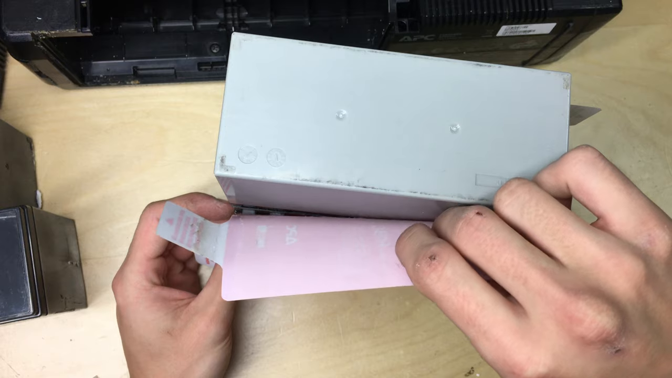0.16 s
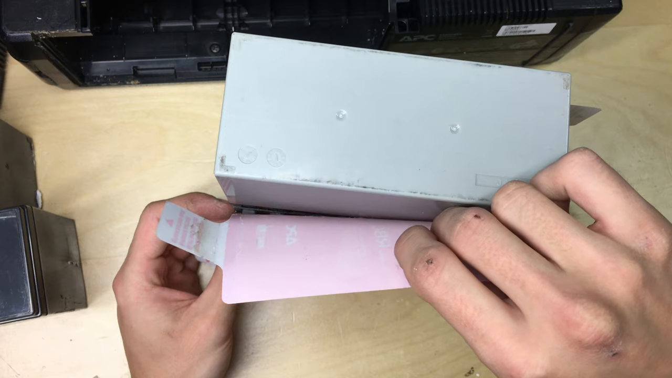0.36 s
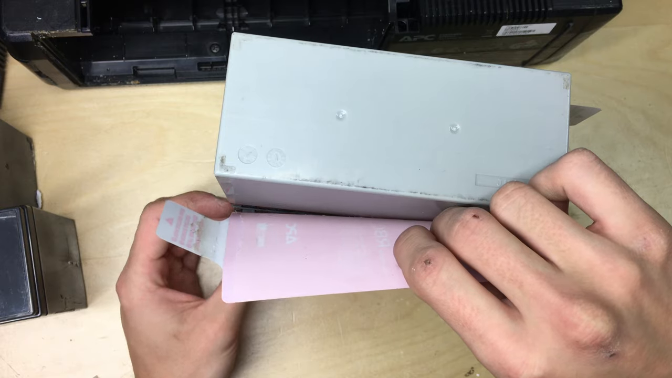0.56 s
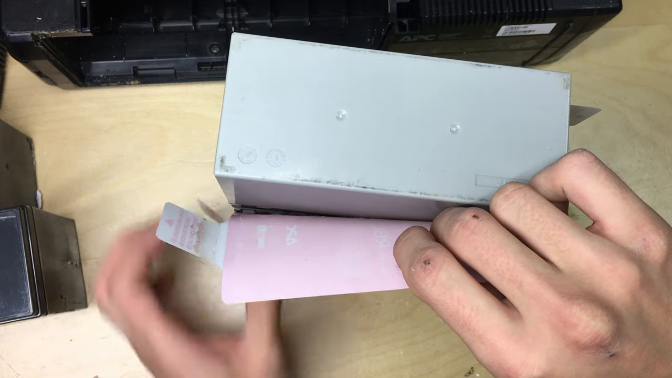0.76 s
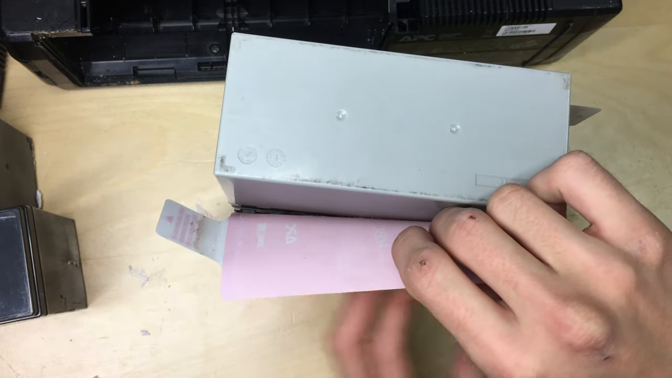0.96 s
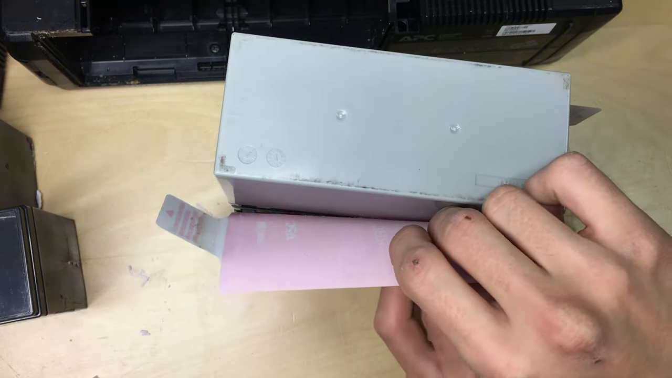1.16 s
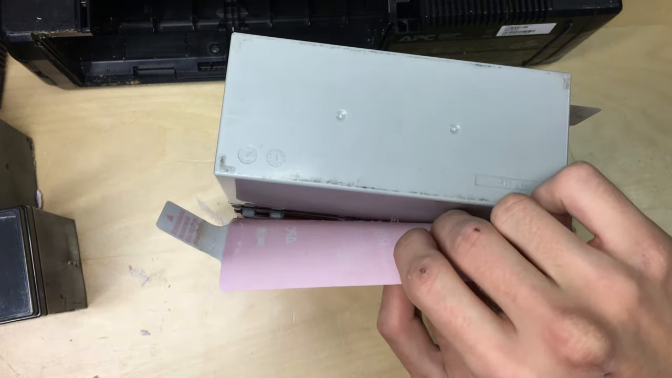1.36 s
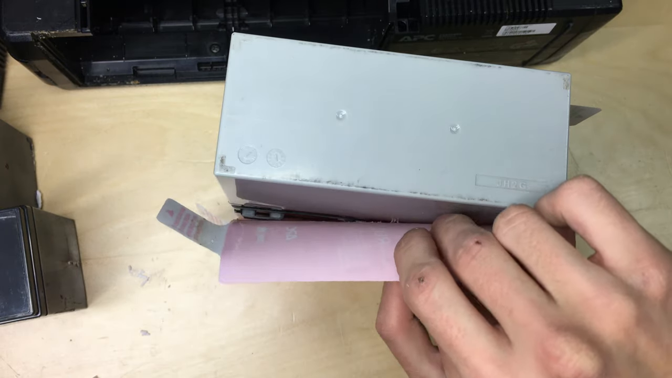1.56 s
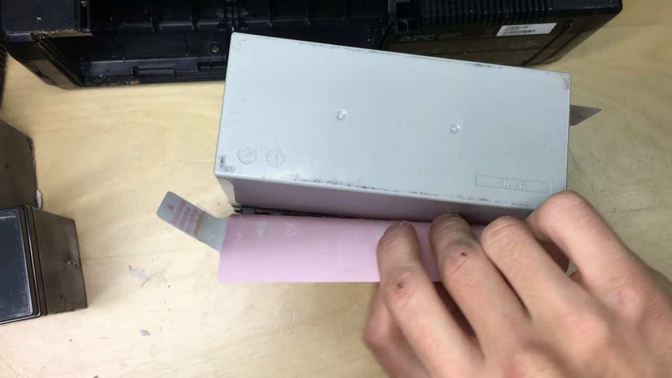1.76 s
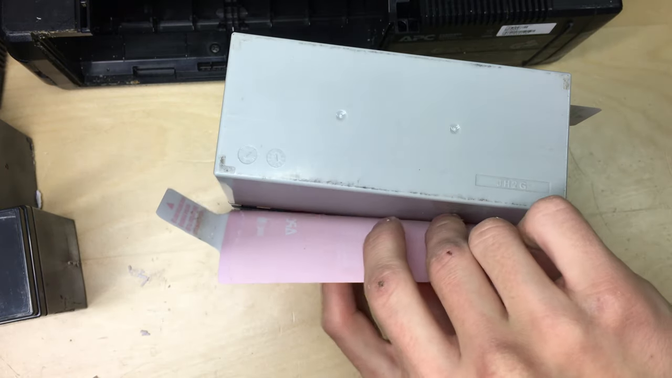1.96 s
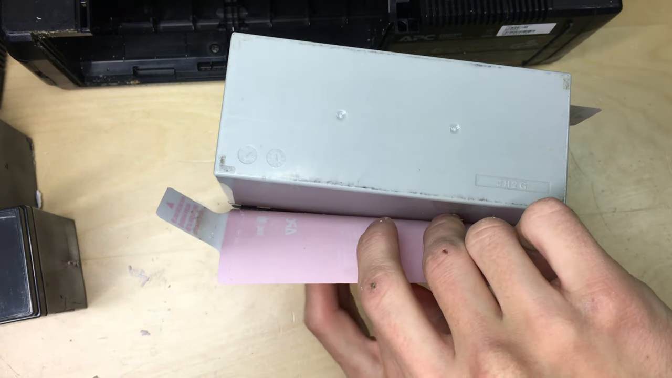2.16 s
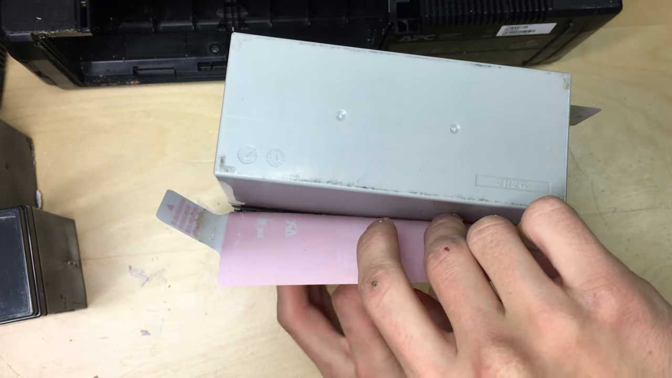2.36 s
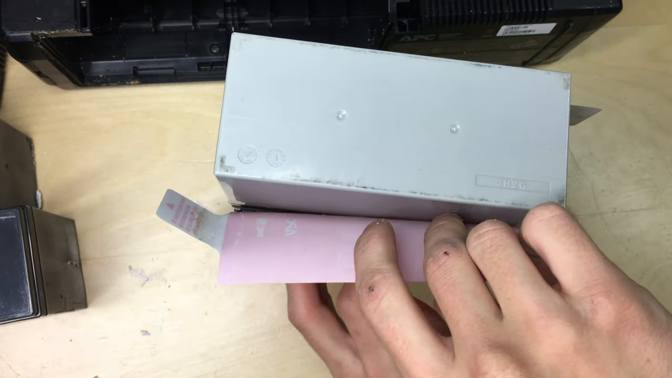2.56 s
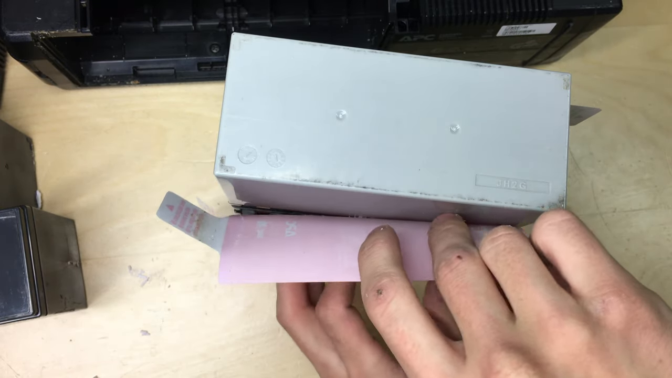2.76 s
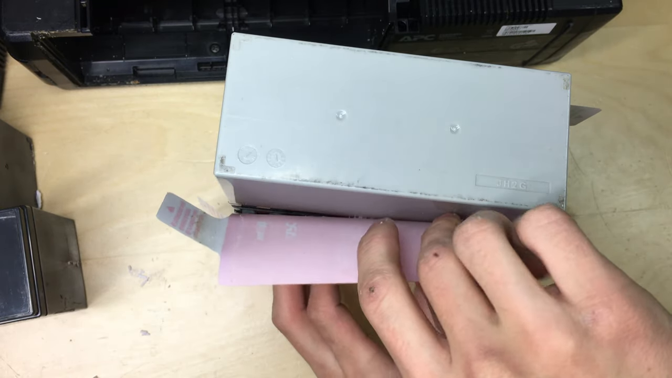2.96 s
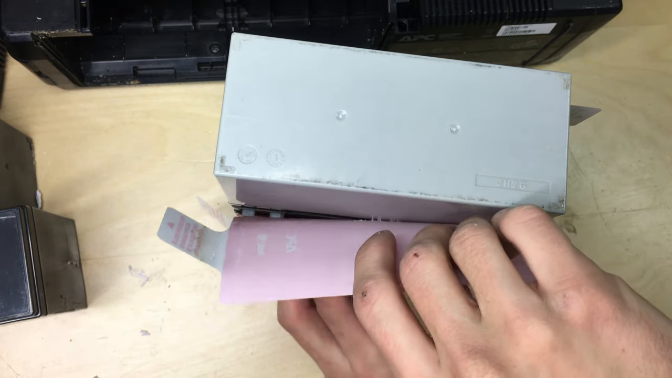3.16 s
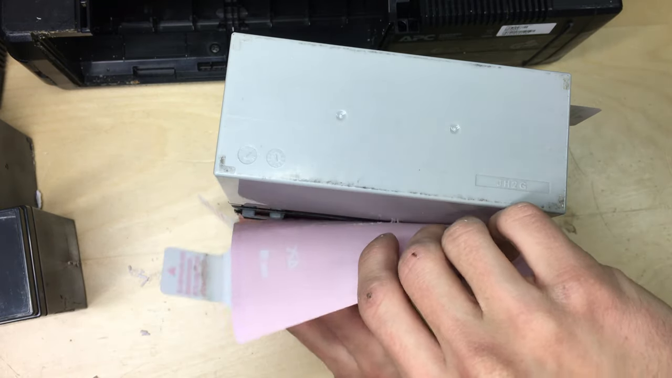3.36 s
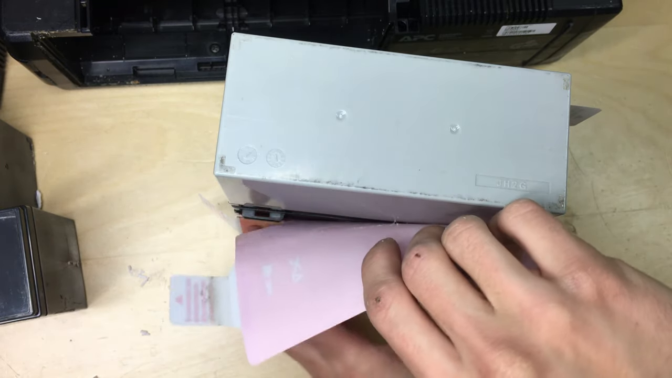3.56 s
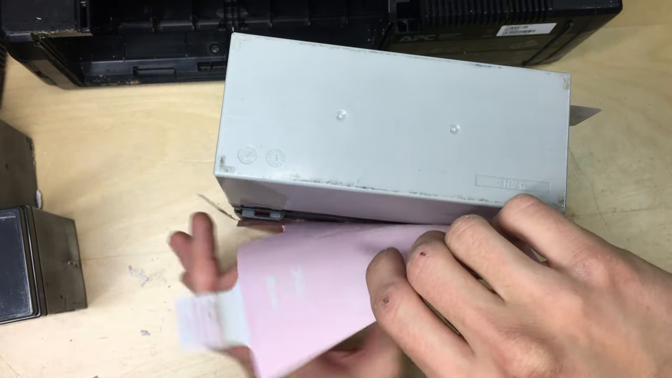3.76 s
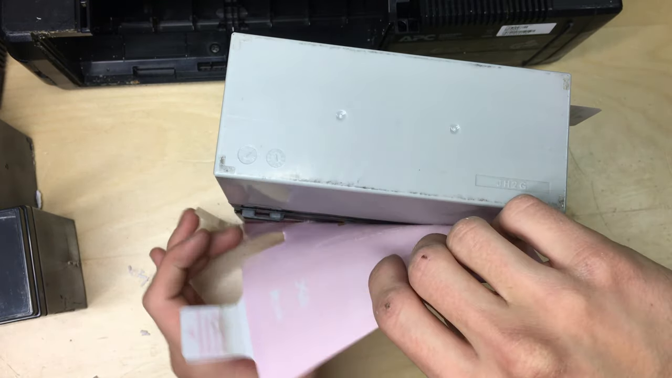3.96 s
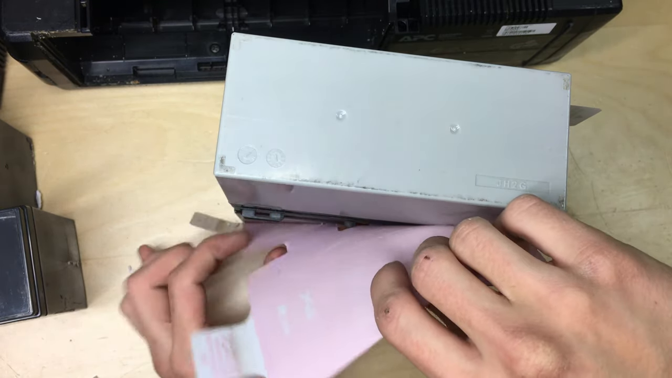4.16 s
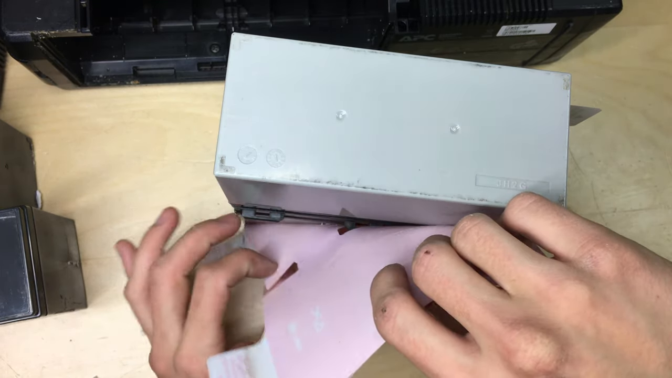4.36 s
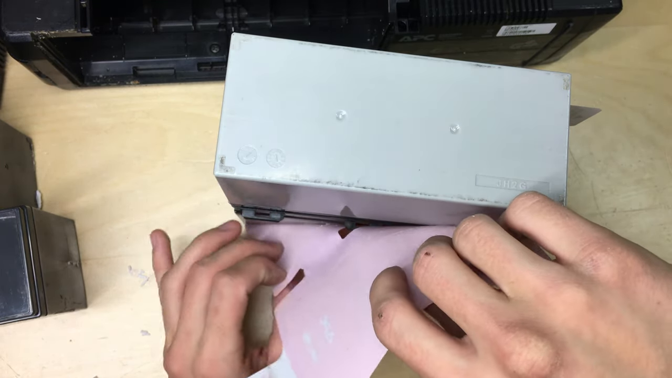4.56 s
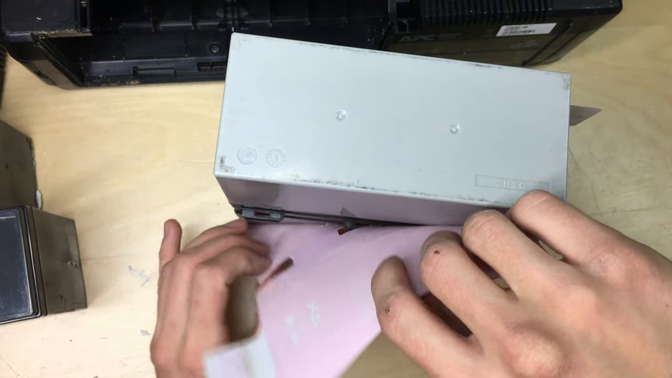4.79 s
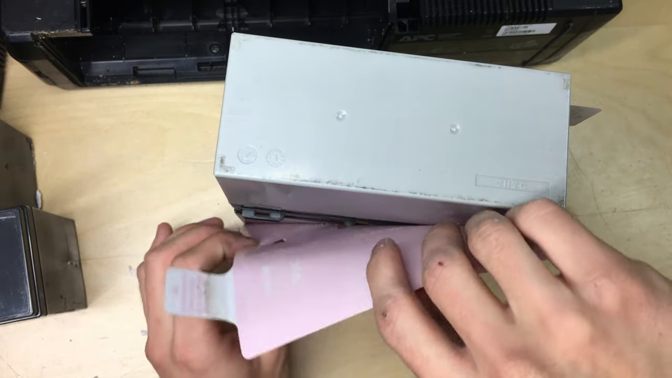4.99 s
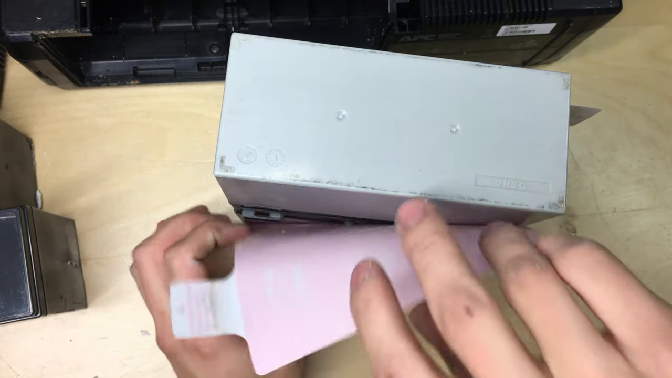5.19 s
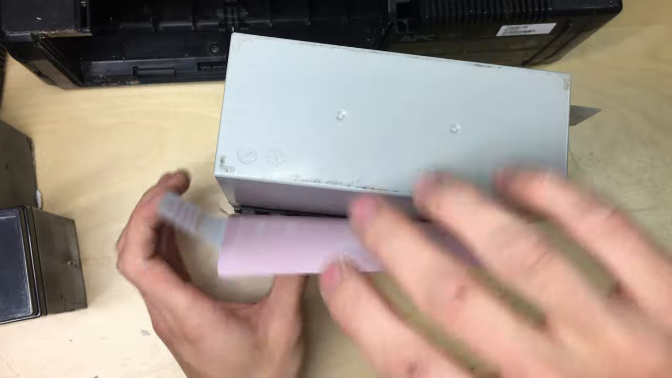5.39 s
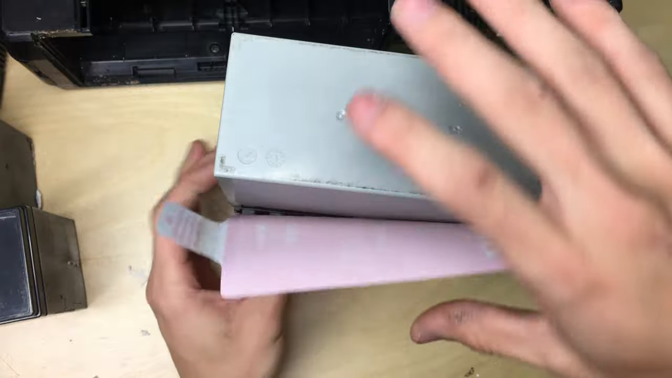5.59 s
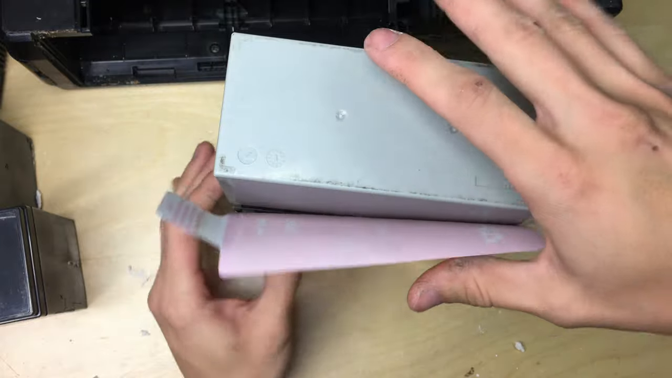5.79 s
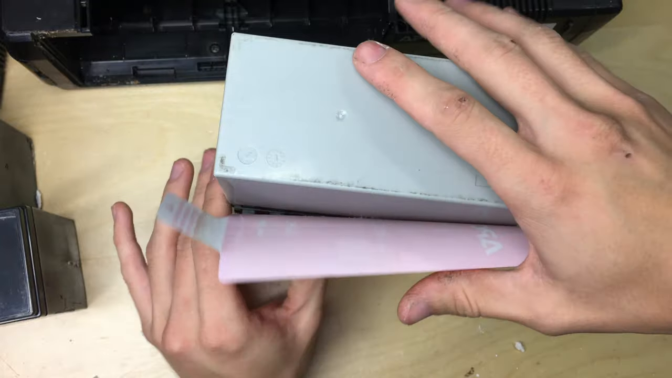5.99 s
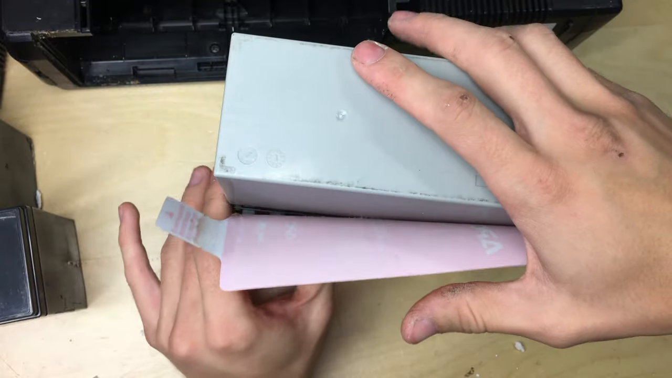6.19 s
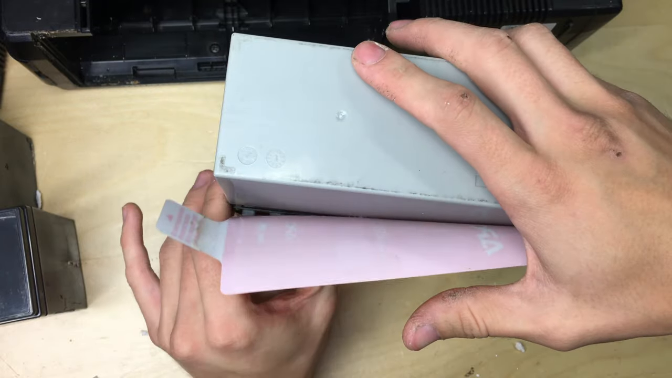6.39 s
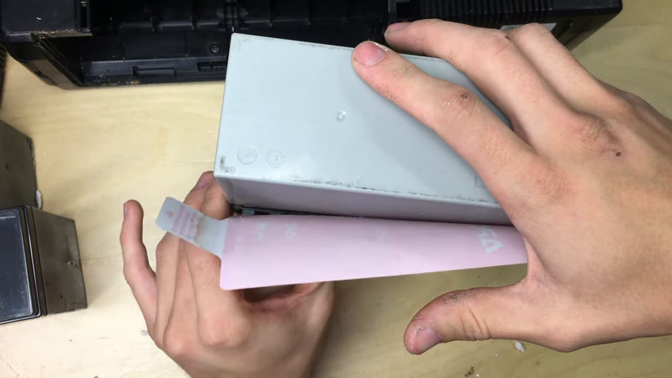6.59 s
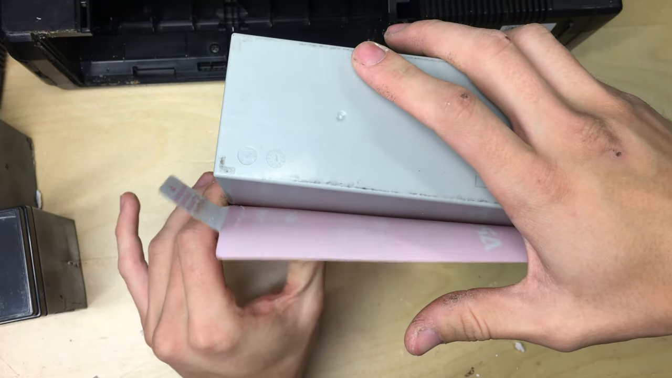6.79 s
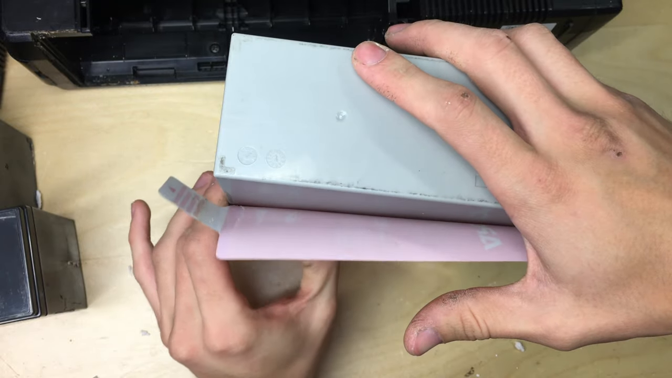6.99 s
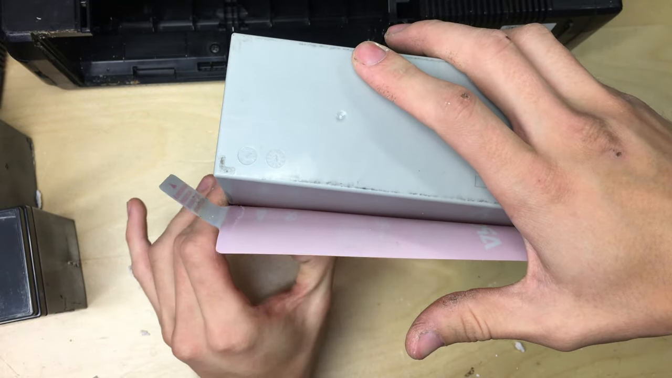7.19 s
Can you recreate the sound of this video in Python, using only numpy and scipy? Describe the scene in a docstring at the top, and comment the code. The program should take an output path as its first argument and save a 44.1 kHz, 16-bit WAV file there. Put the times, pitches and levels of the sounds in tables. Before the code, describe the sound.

Fingertips rub a stiff adhesive label in a humming workroom, then glue peels in hissing pulls with sharp paper snaps, flapping and a brief squeak.

```python
"""A quiet workroom hums and whines while fingertips rub a stiff adhesive label, one juddering as it slips off.
Small ticks and crackling glue threads come as the backing paper is lifted, and the bench takes soft bumps.
Then the glue hisses in separate pulls; the sheet buckles with small snaps, one loud one and more after it,
flapping and kicking, and squeaks under the pull. A few last rubs and ticks follow. Noise drives friction,
glue and air; short pulses and bursts make ticks and snaps; decaying sines make rings and bumps."""
import sys
import numpy as np
from scipy import signal
from scipy.fft import rfft, irfft
from scipy.io import wavfile
from scipy.ndimage import uniform_filter1d

SR = 44100
rng = np.random.default_rng(int(sys.argv[2]) if len(sys.argv) > 2 else 0)


def transcribe(signal):
    """Save signal, clipped to [-1, 1], as a 16-bit WAV file at the path in sys.argv[1]."""
    frames = np.atleast_2d(signal).T
    limited = np.clip(frames, -1, 1)
    pcm = np.round(limited * 32767).astype(np.int16)
    wavfile.write(sys.argv[1], SR, pcm)


N = 319221
TIME = np.arange(N) / SR


def amp(db):
    """Decibels to gain."""
    return np.exp(np.log(10) / 20 * np.asarray(db))


def unit(x):
    """Scales to an rms of one."""
    return x / np.sqrt(np.mean(x ** 2) + 1e-20)


def crest(x, size=176):
    """Scales so that the loudest 4 ms have an rms of one."""
    return x / np.sqrt(uniform_filter1d(x ** 2, size, mode="constant").max() + 1e-20)


def read(points, hz):
    """Reads a curve on a log-frequency axis."""
    f, value = np.transpose(points)
    return np.interp(np.log(hz + 1), np.log(f + 1), value)


def add(mix, s, sound):
    """Mixes a sound in at a time in seconds."""
    part = mix[round(s * SR):][:len(sound)]
    part += sound[:len(part)]


def colour(x, points, size=2048):
    """Causal, minimum-phase filter with the given spectrum."""
    gain_db = np.maximum(read(points, abs(np.fft.fftfreq(size, 1 / SR))), -100)
    log_gain = np.log(amp(gain_db))
    taps = np.fft.ifft(np.exp(np.conj(signal.hilbert(log_gain)))).real
    return signal.oaconvolve(x, taps[:size // 2])[:len(x)]


def band(x, hz, kind, order=3):
    """Low-pass or high-pass."""
    return signal.sosfilt(signal.butter(order, hz, kind, fs=SR, output="sos"), x)


def resonate(x, hz, width):
    """A resonance of gain one whose pitch can follow a curve."""
    turn = np.exp(2j * np.pi * np.cumsum(hz * np.ones(len(x))) / SR)
    r = np.exp(-np.pi * width / SR)
    # shift the pitch down to zero, smooth, and shift it back up
    return 2 * (turn * signal.lfilter([1 - r], [1, -r], x / turn)).real


def fuzzy_tone(hz, width):
    """Noise through two equal narrow resonances in a row."""
    return unit(resonate(resonate(rng.standard_normal(N), hz, width), hz, width))


def brighten(x, treble_db, split_hz=7500):
    """Sets the treble against the rest of the sound."""
    rest = unit(band(x, split_hz, "low", order=5))
    treble = unit(band(x, split_hz, "high", order=5))
    return rest + amp(treble_db) * treble


def ring(modes, t):
    """Dying modes, each met at a chance point of its swing."""
    return sum(amp(db - 60 * t / t60) * np.sin(2 * np.pi * (hz * t + rng.random())) for hz, db, t60 in modes)


def grains(per_s, spread_db):
    """Random clicks of very unequal size."""
    size = amp(spread_db * np.minimum(rng.exponential(1, N), 4)) * rng.choice([-1, 1], N)
    return size * (rng.random(N) < per_s / SR)


def friction(slips, moves, speed, body_db, fizz_db, split_hz=7500):
    """Shapes micro-slips by the speed of each move; each has its own share of fizz; both bands are trimmed."""
    body, fizz = unit(band(slips, split_hz, "low")), unit(band(slips, split_hz, "high", order=5))
    out = np.zeros(N)
    for *timing, db, top_db in moves:
        out += speed(*timing) * (amp(db + body_db) * body + amp(top_db + fizz_db) * fizz)
    return out


def spell(start, length):
    """Swells and fades along the root of a half sine."""
    return np.sqrt(np.sin(np.pi * np.clip((TIME - start) / length, 0, 1)))


# Spectrum of the room air. Each row: frequency in Hz, density in dB per Hz.
AIR_COLOUR = [(15, -41.5), (25, -9.5), (53, -1), (80, -4.5), (161, -7.5), (190, -5.5), (335, -6.5),
              (427, -14.5), (463, -11.5), (860, -16), (1060, -14), (2610, -25), (2990, -24), (5000, -31),
              (6920, -31.5), (7510, -33), (16000, -38)]
# Steady hums in the room. Each row: frequency in Hz, level in dB, width of each resonance in Hz.
STEADY_HUMS = [(48, -66, 4), (766, -72, 15), (1530, -72, 340)]
# A motor drones, its speed drifting. Each row: time in seconds, pitch in Hz, level in dB.
MOTOR_DRONE = [(0, 186, -66), (.9, 192, -61.5), (2.0, 197, -64), (2.8, 197, -62), (3.8, 193, -62.5),
               (5.4, 189, -65), (6.2, 186, -70), (7.24, 184, -69)]
LOW_HUM_START_S, LOW_HUM_LENGTH_S, LOW_HUM_HZ, LOW_HUM_DB = 3.1, 3.4, 98, -64.5


def background(air_db=-56.18, low_cut_hz=42):
    """Room air as shaped noise, steady hums, a drifting motor drone and a low hum that comes and goes."""
    hz = np.fft.rfftfreq(N, 1 / SR)
    air = unit(irfft(rfft(rng.standard_normal(N)) * amp(read(AIR_COLOUR, hz)), N))
    out = amp(air_db) * band(air, low_cut_hz, "high", order=5)
    for line_hz, db, width in STEADY_HUMS:
        out += amp(db) * fuzzy_tone(line_hz, width)
    low_hum = unit(np.sin(2 * np.pi * LOW_HUM_HZ * TIME))
    out += amp(LOW_HUM_DB) * spell(LOW_HUM_START_S, LOW_HUM_LENGTH_S) * low_hum
    s, drone_hz, drone_db = np.transpose(MOTOR_DRONE)
    pitch = np.interp(TIME, s, drone_hz)
    drone = unit(np.sin(2 * np.pi * np.cumsum(pitch) / SR))
    return out + amp(np.interp(TIME, s, drone_db)) * drone


WHINE_HZ, WHINE_WIDTH_HZ, WHINE_FLUTTER_HZ, WHINE_DB = 12900, 90, 47, -81.5
# A faint high whistle comes and goes.
# Each row: start in seconds, length in seconds, starting pitch in Hz, peak level in dB.
WHISTLE_SPELLS = [(.58, .22, 7020, -69.5), (.85, .1, 6990, -72.5), (.98, .12, 6960, -73),
                  (2.5, .45, 7190, -81), (5.9, .78, 6950, -75.5)]
WHISTLE_SAG_HZ, WHISTLE_WIDTH_HZ = 130, 190


def whines():
    """A fluttering electronic whine, and a thin whistle that sags in pitch each time it appears."""
    flutter = 1 + .5 * np.sin(2 * np.pi * WHINE_FLUTTER_HZ * TIME)
    out = amp(WHINE_DB) * unit(fuzzy_tone(WHINE_HZ, WHINE_WIDTH_HZ) * flutter)
    for start, length, hz, db in WHISTLE_SPELLS:
        pitch = hz - WHISTLE_SAG_HZ * np.clip((TIME - start) / length, 0, 1)
        out += amp(db) * spell(start, length) * fuzzy_tone(pitch, WHISTLE_WIDTH_HZ)
    return out


STROKE_ENDS_DB, STROKE_ROUNDNESS = -20.5, 1.49  # every stroke swells and fades along the same arch


def stroke(start, rise_s, fall_s):
    """Gain from the speed of a fingertip: one lopsided arch, down by STROKE_ENDS_DB at either end."""
    since_peak = TIME - start - rise_s
    away = np.minimum(np.maximum(-since_peak / rise_s, since_peak / fall_s), 4)
    return amp(STROKE_ENDS_DB * away ** STROKE_ROUNDNESS)


# Resonances of the label under a fingertip. Each row: resting frequency in Hz, width in Hz, gain in dB.
LABEL_RUB_MODES = [(1550, 260, 10.5), (2120, 500, 1.5), (2630, 220, -3), (3780, 320, -5), (4400, 260, 0),
                   (5330, 160, -11), (6280, 190, -11)]
# The bare hiss of skin on paper. Each row: frequency in Hz, density in dB per Hz.
SKIN_HISS_COLOUR = [(500, -36), (1200, -22), (2700, -0.5), (3500, -0.5), (4500, -1.5), (5800, -5.5),
                    (7500, -29), (9000, -16), (10600, -24), (12500, -16), (16000, -30)]


def rubbed(slips, grip):
    """The label answers slips with its resonances and a bare hiss."""
    body = sum(amp(db) * resonate(slips, hz * grip, width) for hz, width, db in LABEL_RUB_MODES)
    return band(body, 1070, "high") + colour(slips, SKIN_HISS_COLOUR)


# Fingertips slide on the label. Each row: start in seconds, speeding up in seconds, slowing down in seconds,
# rub in dB and fizz in dB (both before the shared trims), swish in dB.
FINGER_STROKES = [(.4, 0.057, .045, -57.5, -77, -70), (.67, .045, .04, -54, -69, -65),
                  (.73, .035, .13, -55, -56, -68), (1.55, .12, .12, -66, -81, -68),
                  (1.685, .018, .035, -54, -72, -72), (1.97, .052, .04, -46.5, -66, -65),
                  (2.14, 0.15, .06, -54.5, -65, -62.5), (2.36, .04, .04, -56, -78, -70),
                  (2.9, .025, .04, -56, -77, -72), (5.53, 0.039, .04, -55, -73, -69),
                  (5.65, .14, .09, -55, -70.5, -64.5), (5.83, 0.066, .045, -55, -60, -67),
                  (6.045, 0.016, .035, -53.5, -69.5, -72.5), (6.14, 0.024, 0.031, -56, -78, -68),
                  (6.68, .022, 0.13, -42, -69, -62.5), (6.788, 0.0093, 0.027, -52, -77, -70),
                  (6.89, 0.076, .04, -52, -77.5, -62.5), (7.036, .025, .065, -50.5, -80, -59.5)]


def rubs(drift=0.043, drift_per_s=2, catch_db=2, catch_hz=140, swish_hz=5050, swish_width_hz=1700):
    """Skin catches and slips on the label, whose resonances shift as the grip moves; a swish lies on top."""
    catches = unit(band(rng.standard_normal(N), catch_hz, "low"))
    slips = grains(per_s=7200, spread_db=2.0) * amp(catch_db * catches)
    grip = 1 + drift * np.sin(2 * np.pi * (TIME * drift_per_s + rng.random()))
    swish = unit(resonate(resonate(slips, swish_hz, swish_width_hz), swish_hz, swish_width_hz))
    swish *= sum(amp(db) * stroke(start, rise_s, fall_s) for start, rise_s, fall_s, *_, db in FINGER_STROKES)
    rub_moves = [row[:-1] for row in FINGER_STROKES]
    return swish + friction(rubbed(slips, grip), rub_moves, stroke, body_db=-3.0, fizz_db=.7)


# A fingertip judders off the label in two surges.
# Each row: start in seconds, length in seconds, level in dB, treble against the rest in dB.
JUDDER_SURGES = [(.687, .044, -45, -5), (.741, .022, -47, 3)]
# Resonances of the taut label. Each row: frequency in Hz, gain in dB.
TAUT_MODES = [(1620, 2), (2210, -1), (2870, -1), (3590, -5), (4980, 0), (6140, -6), (8700, -12)]
# The slips speed up; each dies to 1/e within a share of its cycle.
JUDDER_PER_S, JUDDER_CLIMB_PER_S2, SLIP_SHARE = 120, 2800, 0.34


def judder(width_hz=170, hiss_db=-17, split_hz=4200):
    """A tacky fingertip sticks and slips ever faster as it pulls away, ringing the taut label."""
    out, t = np.zeros(N), np.arange(SR // 10) / SR
    turns = t * (JUDDER_PER_S + .5 * JUDDER_CLIMB_PER_S2 * t)
    for start, length, db, treble_db in JUDDER_SURGES:
        slips = rng.standard_normal(len(t)) * np.exp(-(turns % 1) / SLIP_SHARE) * (t < length)
        rings = sum(amp(mode_db) * resonate(slips, hz, width_hz) for hz, mode_db in TAUT_MODES)
        rings = band(rings, 1300, "high") + amp(hiss_db) * colour(slips, SKIN_HISS_COLOUR)
        add(out, start, amp(db) * crest(brighten(rings, treble_db, split_hz)))
    return out


# Spells of fine crackle.
# Each row: start in seconds, end in seconds, average clicks per second, level in dB.
CRACKLE_SPELLS = [(1.1, 1.225, 730, -66.5), (1.33, 1.78, 260, -65.5), (3.07, 3.433, 130, -64.5),
                  (3.5, 3.66, 200, -65.5), (3.92, 4.021, 450, -55.5), (3.66, 3.9, 380, -59),
                  (4.249, 4.624, 240, -59.5), (5.11, 5.3, 300, -56.5)]
# Spectrum shared by crackle and ticks. Each row: frequency in Hz, density in dB per Hz.
SMALL_CLICK_COLOUR = [(240, -37), (400, -5.5), (1110, 0.5), (1750, 6.5), (2750, 1.5), (3750, -2),
                      (4240, -0.5), (4730, -4.5), (5430, -0.5), (7060, -6.5), (11000, -6.5), (13300, -13),
                      (16000, -18)]


def crackle(spread_db=3.5):
    """Tiny glue threads part as random clicks while the label is lifted."""
    out = np.zeros(N)
    for start, end, per_s, db in CRACKLE_SPELLS:
        clicks = colour(grains(per_s, spread_db) * (TIME > start) * (TIME < end), SMALL_CLICK_COLOUR)
        # the level holds over the spell rather than over the whole scene
        out += amp(db) * unit(clicks) * np.sqrt((end - start) / TIME[-1])
    return out


# Small ticks: creases, parting glue threads and soft fingertip taps. Each row: time in seconds, level in dB,
# body under 2.8 kHz against the rest in dB, treble against the rest in dB.
SMALL_TICKS = [(1.1056, -45, 9, -20), (1.1159, -45, 8, -23), (1.1761, -49.5, 10, -20),
               (1.3412, -50.5, 0, -5), (1.361, -51.5, -1, -5), (1.4546, -53, 0, -6), (1.505, -50.5, -8, -1),
               (1.5235, -49, 6, -4), (1.702, -52, 4, -12), (1.7519, -42.5, 10, -15.5), (2.77, -49, 7, -18),
               (3.0202, -51.5, 3, -7.5), (3.09, -42.5, 0, -8.5), (3.105, -51, -3, -3),
               (3.149, -51.5, 1, -5), (3.194, -44.5, 1, -5.5), (3.233, -52.5, -1, -6),
               (3.2978, -47, -12, 0), (3.3121, -30.5, -4.5, -10.5), (3.3717, -44.5, -5, -6),
               (3.4061, -39, 0, -8), (3.594, -28, -14.5, -9.5), (3.6695, -46.5, -3, -8),
               (3.6746, -42.5, 2, -8), (3.684, -45, -4, -4), (3.6907, -35, 2, -15.5),
               (3.8788, -42, -11, -4.5), (3.9305, -40.5, -14.5, -1), (3.9957, -37.5, -9, 3),
               (4.004, -42, -4, -3), (4.0241, -33, -16, 1.5), (4.0297, -34.5, -21, 1),
               (4.037, -37.5, -22, 0), (4.052, -39, -16, -2), (4.0571, -35, -19, -6),
               (4.0697, -30, -20, -5.5), (4.3639, -46, -19, 6), (4.5226, -44, -17, -1),
               (4.545, -42, -4, -.5), (4.606, -46.5, -10, -6), (4.7531, -48, -2.5, -7),
               (5.4344, -54, 1, -14.5), (5.7848, -40, 4, -20), (5.9915, -50, 7, -19),
               (6.6918, -39.5, 5.5, -19), (6.761, -48, -14, -11), (6.7976, -46.5, 0, -17),
               (6.8924, -42.5, -5, -23)]


def ticks(scatter=.22, scatter_s=0.0012, tail=0.052, tail_s=0.0088, zing_gain=1.2, zing_hz=3400,
          zing_spread=.2, zing_per_db=.02, zing_width_hz=280, body_hz=2800, crisp_db=-11, cushion=0.37):
    """A crease, glue thread or soft tap: one pulse, scattered by the sheet's edges, with a brief own pitch."""
    out, t = np.zeros(N), np.arange(2400) / SR
    for s, db, body_db, treble_db in SMALL_TICKS:
        near, far = rng.standard_normal((2, len(t)))
        # dull ticks have a fingertip on the sheet, which also draws them out
        spread_s = scatter_s * (1 + cushion * max(crisp_db - treble_db, 0))
        echoes = scatter * near * np.exp(-t / spread_s)
        echoes += tail * band(far, 5000, "low", order=1) * np.exp(-t / tail_s)
        pulse = colour((t == 0) + echoes, SMALL_CLICK_COLOUR)
        # the pitch varies by chance and sits higher where there is less body
        pitch = zing_hz * np.exp(zing_spread * rng.standard_normal() - zing_per_db * body_db)
        pulse += zing_gain * resonate(pulse, pitch, zing_width_hz)
        pulse = amp(body_db) * unit(band(pulse, body_hz, "low")) + unit(band(pulse, body_hz, "high"))
        add(out, s, amp(db) * crest(brighten(pulse, treble_db)))
    return out


# Flaps and low knocks of the sheet, alone or on top of a snap.
# Each row: time in seconds, level in dB, main ring in Hz.
SHEET_FLAPS = [(1.117, -50, 650), (1.753, -49, 1000), (3.7645, -37, 1006), (4.113, -38, 660),
               (4.1155, -24, 1805), (4.126, -35, 1750), (4.587, -41, 950), (4.816, -42, 1397),
               (4.97, -48, 1800), (5.06, -47, 1540), (5.149, -36, 650), (5.202, -36, 640),
               (5.2102, -33.5, 1560), (5.221, -42, 640), (5.222, -42, 1800), (5.284, -36, 1010),
               (6.062, -47, 900), (6.077, -48.5, 860)]
# Modes of the sheet at rest. Each row: frequency in Hz, level in dB, t60 in seconds.
SHEET_MODES = [(335, -29, .07), (650, -17, .05), (750, -21, .045), (1015, -18, .04), (1300, -14, .04),
               (1525, -10, .036), (1715, -13, .037), (1925, -16, .02), (2410, -17, .04), (2630, -19, .035)]
# a snap harder than this throws the sheet wide, and its ring comes later
THROW_DB, RING_LAG_S_PER_DB = -31, .00021


def flaps(main_t60=0.027, rise_s=0.0013, rattle_db=-14.0, rattle_s=0.0098, bend=0.24, bend_s=.0013,
          reach=1.9, detune=.012, uneven_db=2, ragged_db=3):
    """Bending waves ring in the sheet with each snap, flap or low knock, the pitch starting high and settling."""
    out, t = np.zeros(N), np.arange(7000) / SR
    # a clock that runs fast at first raises every pitch at the onset
    falling = t + bend * bend_s * (1 - np.exp(-t / bend_s))
    after_snaps = [(s + RING_LAG_S_PER_DB * max(db - THROW_DB, 0), ring_db, hz)
                   for s, db, *_, ring_db, hz in BUCKLE_SNAPS]
    for s, db, hz in after_snaps + SHEET_FLAPS:
        # the sheet is bent differently every time, which shifts its modes and favours different ones
        bent = [(f * (1 + detune * rng.standard_normal()), mode_db + uneven_db * rng.standard_normal(), t60)
                for f, mode_db, t60 in SHEET_MODES]
        modes = ring(bent + [(hz, 0, main_t60)], falling)
        rattle = band(rng.standard_normal(len(t)), 420, "high") * np.exp(-t / rattle_s)
        rattle *= amp(ragged_db * unit(band(rng.standard_normal(len(t)), 200, "low")))
        flap = crest(modes) + amp(rattle_db) * crest(band(rattle, 2300, "low"))
        flap *= 1 - np.exp(-t / rise_s)
        add(out, s, amp(db) * crest(band(flap, reach * hz, "low")))
    return out


# Hand and case bump the bench. Each row: time in seconds, level in dB before the shared trim.
BENCH_BUMPS = [(1.122, -44), (1.155, -52), (4.079, -41.5), (4.114, -34.5), (4.895, -44.5), (5.098, -41),
               (5.153, -39), (5.204, -37.5), (5.283, -44.5)]
# Modes of the bench and the case on it. Each row: frequency in Hz, level in dB, t60 in seconds.
BENCH_MODES = [(62, -7, .24), (88, -2.5, .11), (119, -2, .15), (176, -4.5, .12), (248, -1, .065),
               (335, -5.5, .07), (455, -3, .05), (720, -3, .04)]


def bumps(rise_s=0.0026, trim_db=-1.4):
    """Soft blows into the bench top, heard as its low modes dying away."""
    out, t = np.zeros(N), np.arange(SR // 4) / SR
    for s, db in BENCH_BUMPS:
        add(out, s, amp(db + trim_db) * crest(ring(BENCH_MODES, t) * (1 - np.exp(-t / rise_s))))
    return out


PULL_ATTACK_S, PULL_RELEASE_S, PULL_SAG_DB = .012, 0.015, -2


def pull(start, length):
    """Speed of the glue line: it gives way, runs on while the tension sags, and stops."""
    t = np.maximum(TIME - start, 0)
    held = np.minimum(t / PULL_ATTACK_S, 1) * amp(PULL_SAG_DB * np.minimum(t / length, 1))
    return held * np.exp(-np.clip(t - length, 0, 1) / PULL_RELEASE_S)


# The glue line advances in separate pulls.
# Each row: start in seconds, length in seconds, hiss in dB and fizz in dB (both before the shared trims).
GLUE_PULLS = [(3.66, .04, -54, -65), (3.712, 0.048, -47, -61), (3.802, .11, -62, -67),
              (4.018, 0.051, -51, -45), (4.103, .15, -51, -65), (4.26, 0.23, -57.5, -60.5),
              (4.503, .1, -60, -62.5), (4.627, 0.065, -48.5, -63), (4.833, .085, -42.5, -60),
              (4.93, .08, -52.5, -70), (5.007, .028, -44, -55.5), (5.07, 0.09, -49, -59),
              (5.175, .14, -45, -60)]
# Spectrum of parting glue. Each row: frequency in Hz, density in dB per Hz.
GLUE_COLOUR = [(240, -37), (420, -4.5), (700, -.5), (900, -5.5), (1510, -0.5), (1800, -0.5), (2400, -8),
               (3100, -5), (4000, -8), (7510, -12.5), (9320, -11.5), (10400, -16), (11400, -13.5),
               (16000, -15)]


def peel(clump_db=2, clump_hz=70):
    """Thousands of glue threads part in uneven clumps."""
    clumps = unit(band(rng.standard_normal(N), clump_hz, "low"))
    threads = grains(per_s=5000, spread_db=3.5) * amp(clump_db * clumps)
    return friction(colour(threads, GLUE_COLOUR), GLUE_PULLS, pull, body_db=-2, fizz_db=1.5)


# The sheet buckles, then rings. Each row: time in seconds, level in dB, treble against the rest in dB,
# scrape that leads in, in dB, first crack against the burst in dB, crack decay in ms, crease pitch in Hz,
# ring level in dB, ring pitch in Hz (the ring is played by flaps).
BUCKLE_SNAPS = [(3.7662, -38, -12, 2, -10, 2, 2000, -31, 1280),
                (3.8542, -38, -10, -7.5, -10, 3, 2650, -34, 1660),
                (4.0722, -12.5, -8, -34, -14, 2.3, 5600, -15, 1712),
                (4.1107, -21.5, -1.5, -10.5, -3, 1.1, 6500, -26, 1697),
                (4.165, -43, -19, -20, -10, 2.5, 4500, -36.5, 1430),
                (4.1908, -33, -13, -20, -6, 2.8, 3800, -37, 1600),
                (4.2341, -35, -18, -32, -6, 1.7, 3970, -49, 1500),
                (5.0965, -35, -10, 1, 2, 1.3, 1750, -37, 1720),
                (5.1486, -26, -13.5, -15, -3, 4.4, 4240, -29, 1300),
                (5.2014, -29, -12, -11, 0, 2.1, 1750, -29, 1580),
                (5.279, -30, -2, -12, -10, 2.2, 3000, -30, 1636),
                (5.335, -40.5, -10, -11, -15, 4.6, 2700, -40, 1860)]
# Spectrum of a snap. Each row: frequency in Hz, density in dB per Hz.
BUCKLE_COLOUR = [(180, -40.5), (300, -15), (450, -12), (780, -.5), (1690, -0.5), (3400, 2.5), (4370, 3),
                 (4910, -2), (6000, 1), (9880, -5.5), (11900, -1.5), (14200, -10), (15200, -13.5),
                 (16000, -22.5)]


def snaps(lead_s=0.007, tail_db=-22, tail_s=.009, evenness=0.9, crease_gain=0.7, crease_width_hz=1800,
          zing_gain=.8, zing_width_hz=170):
    """The sheet scrapes as strain builds, then gives way with one sharp crack and a tight burst of others."""
    out, t = np.zeros(N), np.arange(-1500, 4000) / SR
    for s, db, treble_db, scrape_db, first_db, crack_ms, hz, *_ in BUCKLE_SNAPS:
        scrape = amp(scrape_db) * np.exp(-abs(t) / lead_s)
        rustle = amp(tail_db) * np.exp(-abs(t) / tail_s)
        age = t * 1e3 / crack_ms
        cracks = rfft(rng.choice([-1, 1], len(t)) * (t >= 0) * np.exp(-age ** 2))
        # so sudden a release holds every frequency about equally
        cracks *= (abs(cracks).mean() / (abs(cracks) + 1e-9)) ** evenness
        cracks = irfft(cracks, len(t)) * (t >= 0) * np.exp(-abs(age) / 10)
        cracks += amp(first_db) * np.linalg.norm(cracks) * (t == 0)
        noise = rng.standard_normal(len(t)) * np.where(t < 0, scrape, rustle)
        burst = colour(cracks + noise, BUCKLE_COLOUR)
        # the crease answers broadly, then its narrow zing is driven by the same burst
        crease = crease_gain * resonate(burst, hz, crease_width_hz)
        burst += crease + zing_gain * resonate(burst, hz, zing_width_hz)
        add(out, s + t[0], amp(db) * crest(brighten(burst, treble_db)))
    return out


# The sheet kicks as it flips over. Each row: time in seconds, level in dB, starting pitch in Hz.
SHEET_KICKS = [(3.856, -42, 1700), (4.0738, -28, 3000), (4.1125, -38, 1200), (4.587, -44, 1500),
               (5.0974, -31, 2000), (5.1485, -37, 1000), (5.2015, -37, 1700)]


def knocks(sweep_s=.0036, fade=1.1, tail_s=.014):
    """A blunt kick spreads through the sheet; low bending waves travel slowest, so its pitch dives."""
    out, t = np.zeros(N), np.arange(SR // 10) / SR
    spread = 1 + t / sweep_s
    for s, db, hz in SHEET_KICKS:
        dive = np.sin(2 * np.pi * np.cumsum(hz / spread ** 2) / SR)
        add(out, s, amp(db) * crest(dive * spread ** -fade * np.exp(-t / tail_s)))
    return out


# Tugs that swell the squeak.
# Each row: time in seconds, level in dB, seconds from the peak to 1/e on either side.
TUG_SWELLS = [(4.668, -55, .03), (4.875, -43.5, .013), (4.898, -36, .006), (4.928, -48.5, .022),
              (5.015, -55.5, .06), (5.245, -35.5, .006)]
# Level in dB of the fundamental and its overtones, in order.
SQUEAK_PARTIALS_DB = [0, -15.5, -20]
# the pitch climbs with the tension, passing SING_HZ at SING_START_S
SING_START_S, SING_HZ, SING_CLIMB_HZ_PER_S = 4.63, 1312, 490


def singing(flutter_db=2.6, wobble_hz=28):
    """The peel drives one mode of the stretched sheet into a rough, unsteady squeak that swells with each tug."""
    wobble, flutter = (unit(band(noise, 120, "low")) for noise in rng.standard_normal((2, N)))
    hz = SING_HZ + SING_CLIMB_HZ_PER_S * (TIME - SING_START_S) + wobble_hz * wobble
    phase = 2 * np.pi * np.cumsum(hz) / SR
    swell = sum(amp(db) * np.exp(-((TIME - s) / fall_s) ** 2) for s, db, fall_s in TUG_SWELLS)
    tone = sum(amp(db) * np.sin(k * phase) for k, db in enumerate(SQUEAK_PARTIALS_DB, 1))
    return swell * unit(amp(flutter_db * flutter) * tone)


# Ring time of the room. Each row: frequency in Hz, t60 in seconds.
ROOM_RING = [(150, 0.61), (1000, 0.21), (4000, 0.13), (14000, 0.13)]


def room(x, wet_db=-14, first_s=0.0024, per_s=4000):
    """Reflections from bench and walls as random taps, the treble dying first."""
    t = np.arange(SR // 2) / SR
    taps = rng.choice([-1, 1], len(t)) * (rng.random(len(t)) < per_s / SR) * (t > first_s)
    hz, s, z = signal.stft(taps, SR, nperseg=256)
    decay = amp(-60 * s / read(ROOM_RING, hz)[:, None])
    tail = signal.istft(z * decay, SR, nperseg=256)[1]
    return x + amp(wet_db) * signal.fftconvolve(x, tail / np.linalg.norm(tail))[:N]


def scene():
    """All the handling sounds in the room, over the background."""
    fingers = rubs() + judder()
    label = crackle() + ticks() + flaps() + peel() + snaps() + knocks() + singing()
    return (background() + whines() + room(fingers + label + bumps()))[None]


# The microphone's ripple in the treble. Each row: frequency in Hz, gain in dB.
MIC_RIPPLE = [(2900, 0), (3200, 0), (3500, -2), (3900, -.5), (4400, 1.5), (4900, -3), (5300, 1.5),
              (6200, 1.5), (6900, 1), (7500, -2), (8300, -.5), (9100, 2), (10300, -2.5), (11600, 1.5),
              (12700, -0.5), (16000, -.5)]
EDGE_HZ = 16200


def record(dry):
    """The colour of the microphone, then a steep upper band limit."""
    heard = colour(dry[0], MIC_RIPPLE)[None]
    return signal.oaconvolve(heard, signal.firwin(255, EDGE_HZ, window=("kaiser", 9), fs=SR)[None], "same")


dry = scene()
out = record(dry)
transcribe(out)
```